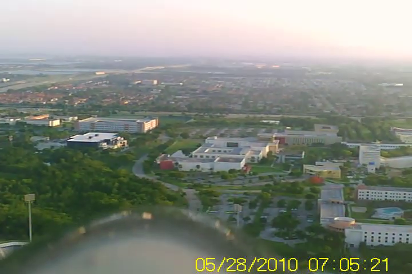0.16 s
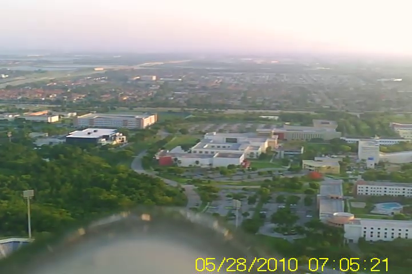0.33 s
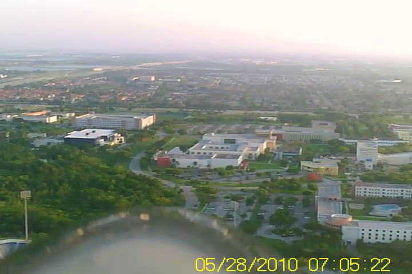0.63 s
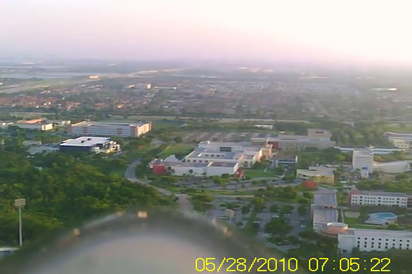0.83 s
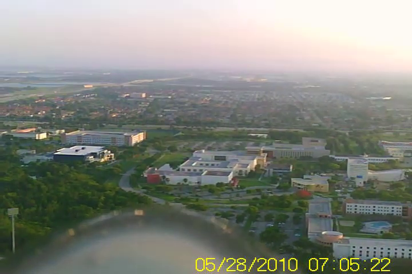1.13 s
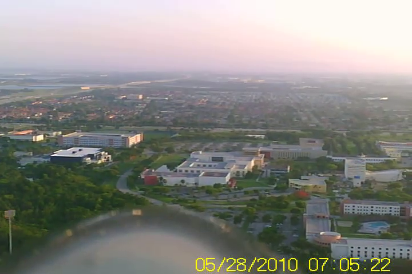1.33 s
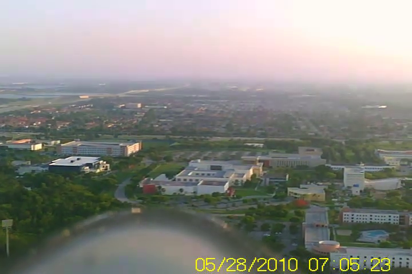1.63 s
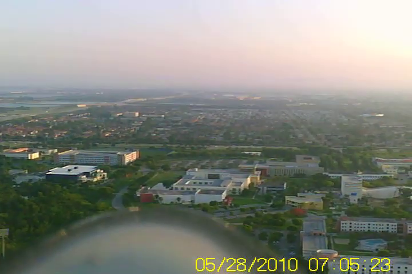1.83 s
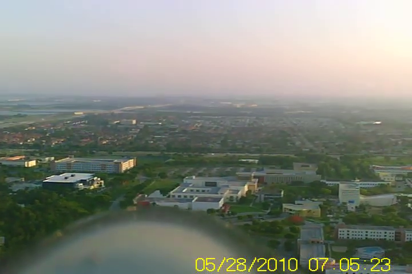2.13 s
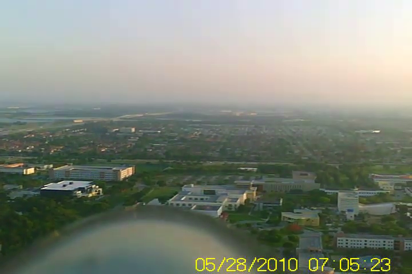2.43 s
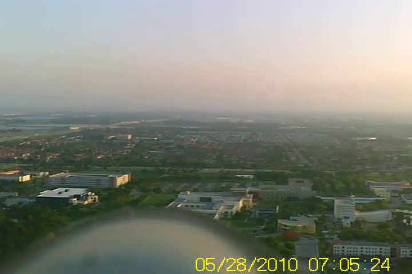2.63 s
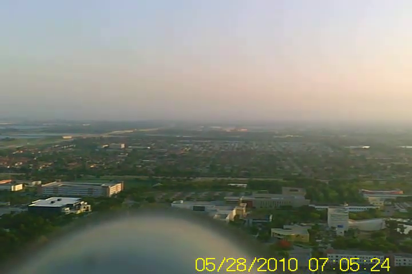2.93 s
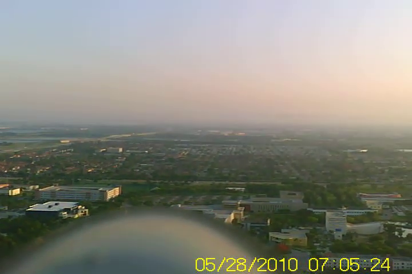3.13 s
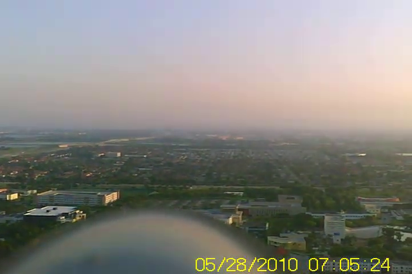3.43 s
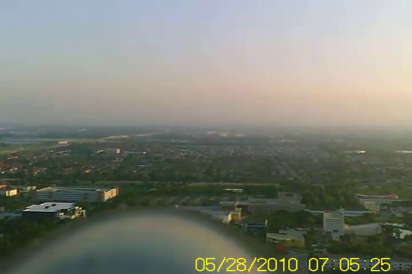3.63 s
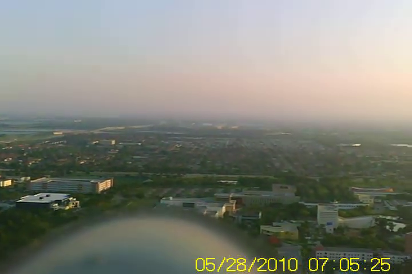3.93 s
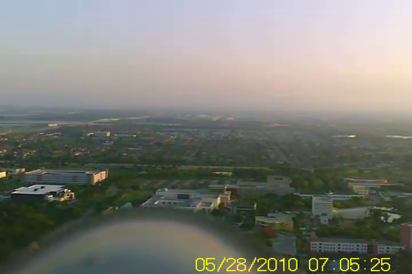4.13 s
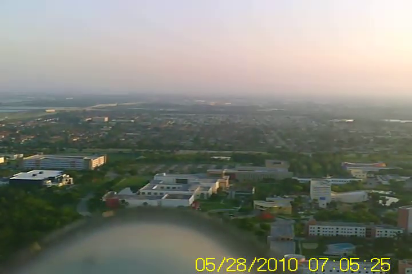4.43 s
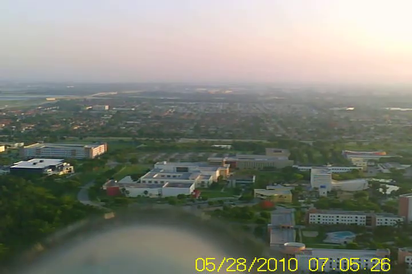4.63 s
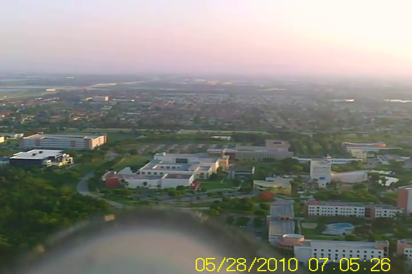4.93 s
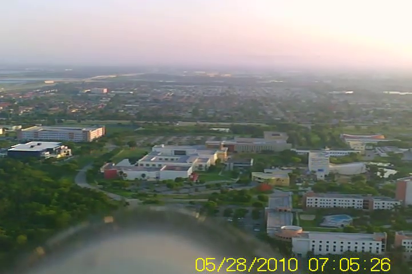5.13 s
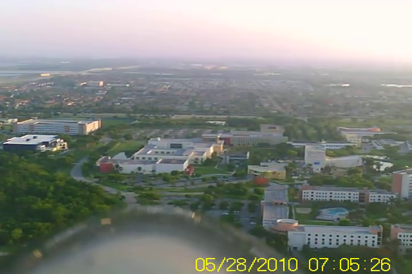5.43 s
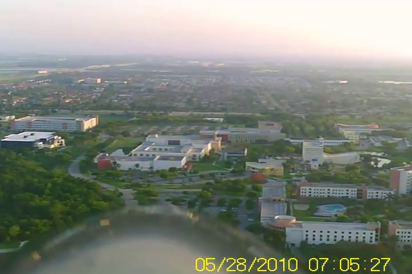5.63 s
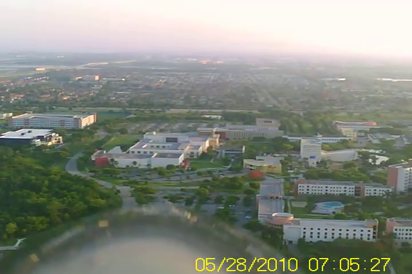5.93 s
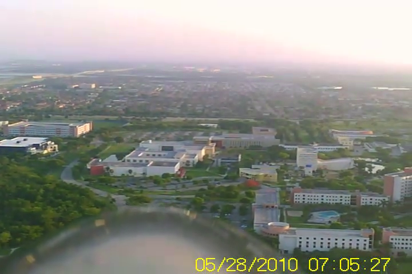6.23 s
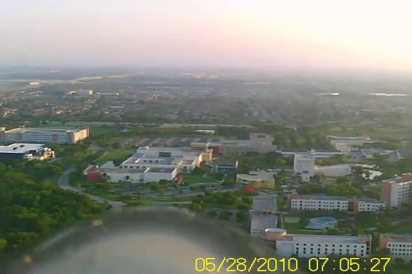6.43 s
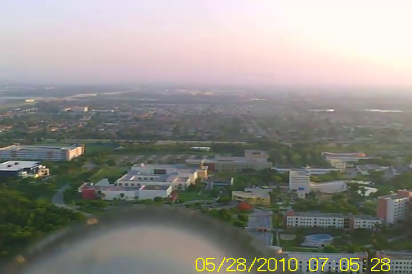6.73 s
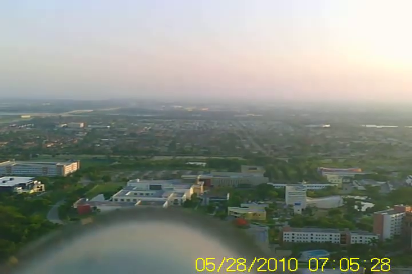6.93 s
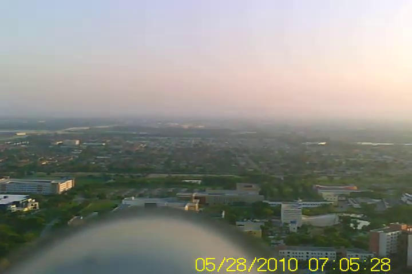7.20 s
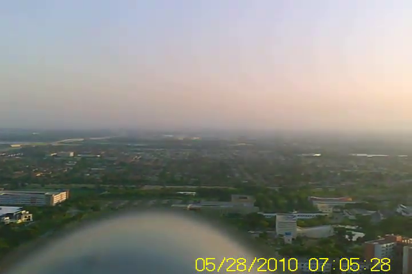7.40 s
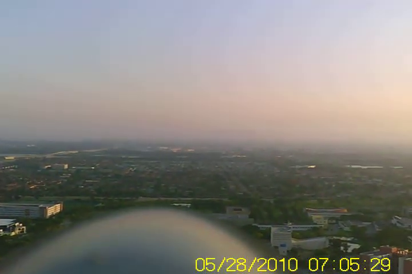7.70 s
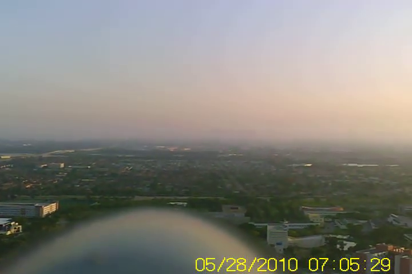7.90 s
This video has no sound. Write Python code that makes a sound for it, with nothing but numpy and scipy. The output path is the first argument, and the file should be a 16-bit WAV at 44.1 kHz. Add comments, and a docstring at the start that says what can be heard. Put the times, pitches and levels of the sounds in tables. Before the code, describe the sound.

Wind blows directly over the microphone of a small camera on a model glider for the whole eight seconds. It is a low, uneven, buffeting rumble with a fluttering midrange rush above it. Fine crackle rides on the gusts, and short soft snaps and spits of turbulence come irregularly, several each second. The wind builds slightly over the first second and holds until about 2.5 seconds. It then eases as the glider slows, and is quietest and dullest just after 4 seconds, with little crackle. From about 4.5 seconds it swells again, becoming loudest, brightest and most crackly between 6 and 7 seconds, then drops a little toward the end. These changes are gentle and the rush never stops. Far underneath, the camera's electronics add a very faint steady hiss and a thin high whine.

```python
"""Wind buffets and rushes over the microphone of a small camera on a gently swooping model glider.
Large eddies thump the port; on each pressure crest the flow breaks into fine eddies that spit and crackle,
and stronger vortices snap across it. Airspeed makes the wind louder and brighter.
Underneath, the camera's electronics add a faint hiss and thin whine."""
import sys
import numpy as np
from scipy import signal
from scipy.fft import rfft, irfft, next_fast_len
from scipy.io import wavfile
from scipy.ndimage import uniform_filter1d

SR = 44100
rng = np.random.default_rng(int(sys.argv[2]) if len(sys.argv) > 2 else 0)


def waveform_to_disk(signal):
    """Save audio, clipped to [-1, 1], as 16-bit WAV at the path in sys.argv[1]."""
    frames = np.transpose(np.atleast_2d(signal))
    scaled = np.clip(frames, -1, 1) * 32767
    samples = np.round(scaled).astype(np.int16)
    wavfile.write(sys.argv[1], SR, samples)


N = 355446
TIME = np.arange(N) / SR


# low rumble of large eddies at the port: freq_hz, density_db
RUMBLE_EQ = [(15, 0.5), (27, -5.5), (50, 0), (85, 1), (150, -0.63), (245, -3), (330, -7), (520, -16),
             (900, -37.5)]

def buffeting(skew, steadiness):
    """Pressure of the large eddies; crests stand a little taller than troughs are deep."""
    pressure = level(colour(rng.standard_normal(N), RUMBLE_EQ), 0)
    # a steady airstream sheds eddies of fairly even strength
    power = uniform_filter1d(pressure ** 2, size=1300)
    pressure = level(pressure / power ** (steadiness / 2), 0)
    rectified = np.logaddexp(pressure, -pressure) - 1
    return level(pressure + skew * rectified, 0)


# midrange body of fine eddies heard through the port: freq_hz, density_db
EDDY_EQ = [(200, 6.5), (350, 10.5), (520, 9.5), (750, 4), (1000, -0.5), (1600, -5.5), (1950, -15.5),
           (2400, -21), (2950, -31), (4600, -41.5), (5300, -43.5), (7000, -59)]

def fine_eddies(crest, crest_db, patchy_db):
    """The rush: millisecond bursts of small eddies, strongest on the pressure crests."""
    bursts = undb(crest_db * crest + patchy_db * flutter(rate_hz=140))
    return level(colour(rng.standard_normal(N) * bursts, EDDY_EQ), 0)


# level ride of the rush, up in each shallow dive and down in the climb: time_s, swell_db
SWOOP_RIDE = [(0, -2), (0.5, 0), (1.2, 1), (1.7, 1.1), (2.5, 0.5), (3.0, -0.45), (3.4, -1.3), (3.75, -2.5),
              (4.1, -4.5), (4.5, -3.5), (5.0, -2.5), (5.55, -0.9), (5.87, 0.7), (6.4, 1.5), (7.0, 1.5),
              (7.5, 0.35), (8.05, -1.3)]

def airspeed():
    """Swell of the rush in dB as the glider gathers and loses speed."""
    return np.interp(TIME, *np.transpose(SWOOP_RIDE))


# short pushes on the rumble and rush: peak_s, rise_db
SURGE_CUES = [(0.71, 0.5), (3.03, 0), (3.21, 1), (3.75, 2.5), (5.92, 2)]

def surges(half_length_s):
    """Brief, slight swells in the level of the wind's rumble and rush, in dB."""
    return sum(db * np.exp(-((TIME - peak_s) / half_length_s) ** 2) for peak_s, db in SURGE_CUES)


# upper-mid bite of a snap: freq_hz, density_db
SPIT_EQ = [(900, 2.5), (1600, 6), (2400, 1), (3000, -2.5), (4700, -6.5), (5600, -23), (7000, -28)]
# bright top of a snap: freq_hz, density_db
SIZZLE_EQ = [(4000, -14), (6000, -3), (7400, -1), (9000, -14.5), (11000, -32)]
# strong vortices snapping across the port, levels before EQ: start_s, spit_db, slap_db, sizzle_db
SNAP_CUES = [(0.084, -39, -20, -68), (0.372, -38, -23, -56), (0.8776, -39, -15, -64),
             (1.0145, -35.5, -16.5, -53), (1.1637, -35.5, -16, -56), (1.2858, -39, -22, -68),
             (1.8399, -34, -21, -52), (2.0843, -37.5, -22, -58), (2.1217, -36, -20, -66),
             (2.5109, -39, -21, -62), (2.7678, -38, -24, -66), (2.7878, -40, -21, -68),
             (2.9697, -35.5, -17, -68), (3.031, -41, -12, -68), (3.1608, -35, -20, -62),
             (3.186, -42, -18, -68), (3.5746, -37, -19, -70), (3.639, -40, -13, -65),
             (3.7811, -44, -26, -68), (4.543, -40, -27.5, -68), (4.8466, -34.5, -19, -62),
             (4.8663, -44, -20.5, -68), (5.1013, -44, -19.5, -68), (5.1936, -41, -18.5, -68),
             (5.2049, -37, -19, -54), (5.3912, -39, -18, -58), (5.425, -42, -25.5, -64),
             (5.459, -42, -14.5, -68), (5.6154, -35.5, -18.5, -60), (5.836, -39, -20.5, -61),
             (5.8724, -42, -16, -62), (6.1655, -39, -26, -54), (6.2007, -42, -24.5, -66),
             (6.2249, -39, -23.5, -64), (6.35, -36, -19.5, -56), (6.5568, -37, -26, -58),
             (6.622, -41, -23, -55), (6.6495, -34, -18, -62), (6.9672, -39, -12.5, -55),
             (7.0219, -44, -13.5, -68), (7.2556, -44, -12, -68), (7.3666, -43, -22, -54),
             (7.4224, -48, -21.5, -58), (7.5286, -34, -13, -64), (7.6066, -37.5, -25, -64)]

def snaps(cues, rise_s):
    """Each vortex breaks up at the port within milliseconds: a spit, a soft slap and a sizzle."""
    length = 512
    age = np.arange(length) / (rise_s * SR)
    envelope = age ** 2 * np.exp(2 * (1 - age))
    layers = np.zeros((3, N + length))
    for start_s, *layers_db in cues:
        start = int(start_s * SR)
        grain = envelope * rng.standard_normal(length)
        layers[:, start:start + length] += undb(layers_db)[:, None] * grain
    spit, slap, sizzle = layers[:, :N]
    return colour(spit, SPIT_EQ) + colour(slap, EDDY_EQ) + colour(sizzle, SIZZLE_EQ)


def stray_vortices(speed_db, per_s, spread_db):
    """Weaker, briefer snaps at random moments, harder at speed."""
    when, strength = rng.random((int(per_s * N / SR), 2)).T
    starts_s = when * TIME[-1]
    force_db = 1.2 * np.interp(starts_s, TIME, speed_db) + spread_db * (2 * strength - 1)
    spit_db, slap_db, sizzle_db = -41 + force_db, -21 + force_db, -62 + force_db
    return snaps(zip(starts_s, spit_db, slap_db, sizzle_db), rise_s=0.00053)


# sharp edge of tiny vortices heard through the port: freq_hz, density_db
CRACKLE_EQ = [(800, -0.5), (1600, 13.5), (2000, 3), (2500, 2.5), (3000, -3.5), (4600, -7), (5400, -21),
              (7000, -19), (9000, -35.5)]

def crackle(crest, per_s, crest_db, spread_db):
    """Tiny vortices hit the port in clusters of unequal force, hardest on the crests."""
    hits = rng.random(N) < per_s / SR
    force = undb(crest_db * crest + spread_db * np.tanh(flutter(rate_hz=400)))
    polarity = rng.choice([-1, 1], N)
    return level(colour(hits * force * polarity, CRACKLE_EQ), 0)


# airy noise floor of the preamplifier: freq_hz, density_db
HISS_EQ = [(100, 0), (5000, 4), (9600, 3.5), (10500, -1), (11300, -17.5), (11800, -30)]
# thin whine of the electronics, rms before the trim: pitch_hz, level_db
WHINE_TONES = [(3892, -86), (5600, -86), (7400, -87), (9600, -90), (10637, -101)]

def electronics(hiss_db, whine_trim_db):
    """The camera's circuits add a steady hiss and a few faint, high tones."""
    whine = sum(undb(level_db + whine_trim_db) * np.sqrt(2) * np.sin(2 * np.pi * pitch_hz * TIME)
                for pitch_hz, level_db in WHINE_TONES)
    return level(colour(rng.standard_normal(N), HISS_EQ), hiss_db) + whine


def undb(db):
    """Decibels to gain."""
    return 10 ** (np.asarray(db) / 20)


def level(x, db):
    """Scale to an rms level."""
    return x * undb(db) / np.sqrt(np.mean(x ** 2))


def colour(x, points):
    """EQ through (freq_hz, gain_db) points joined on a log axis, rolling off outside them."""
    hz, db = np.transpose(points)
    size = next_fast_len(N + SR // 4)
    freq_hz = np.maximum(np.arange(size // 2 + 1) * SR / size, 1)
    rolloff = np.minimum(freq_hz / hz[0], 1) ** 2 * np.minimum(hz[-1] / freq_hz, 1) ** 2
    curve = undb(np.interp(np.log(freq_hz), np.log(hz), db))
    return irfft(rfft(x, size) * rolloff * curve, size)[:N]


def flutter(rate_hz):
    """Smooth random modulation with an rms of 1, low-passed at rate_hz."""
    smooth = signal.butter(2, min(rate_hz, SR / 4), fs=SR, output="sos")
    return level(signal.sosfilt(smooth, rng.standard_normal(N)), 0)


def scene():
    """Airspeed drives every scale of turbulence: the smaller the eddies, the more they swell."""
    swell_db, surge_db = airspeed(), surges(half_length_s=0.041)
    speed_db = swell_db - np.mean(swell_db)
    pressure = buffeting(skew=0.32, steadiness=0.24)
    # the flow tears off on the crests and lies smooth in the troughs
    crest = np.logaddexp(0, 2 * np.minimum(pressure, 1.9)) / 2
    rumble = pressure * undb(-20 + 0.56 * speed_db + surge_db)
    rush = fine_eddies(crest, crest_db=3, patchy_db=1.46) * undb(-30 + swell_db + surge_db)
    grit = crackle(crest, per_s=2200, crest_db=4, spread_db=7) * undb(-54 + 2.4 * speed_db)
    noise_floor = electronics(hiss_db=-71.5, whine_trim_db=1.6)
    vortices = snaps(SNAP_CUES, rise_s=0.0012) + stray_vortices(speed_db, per_s=10, spread_db=4)
    return (rumble + rush + vortices + grit + noise_floor)[None]


def record(dry):
    """The small camera cuts the top of the treble; 2 ms fades keep both ends free of clicks."""
    fades = np.minimum(np.minimum(TIME, TIME[::-1]) / 0.002, 1)
    high_cut = signal.ellip(8, 0.2, 70, 11900, fs=SR, output="sos")
    return fades * signal.sosfilt(high_cut, dry)


dry = scene()
out = record(dry)
waveform_to_disk(out)
```